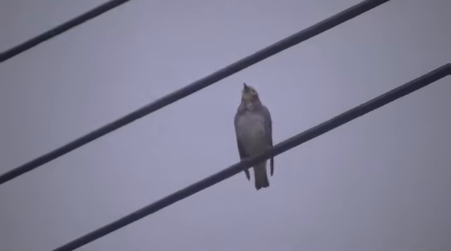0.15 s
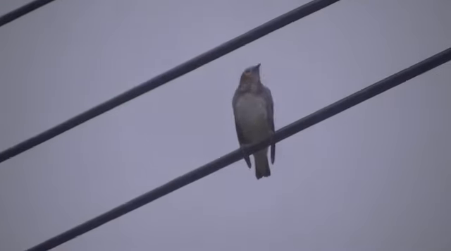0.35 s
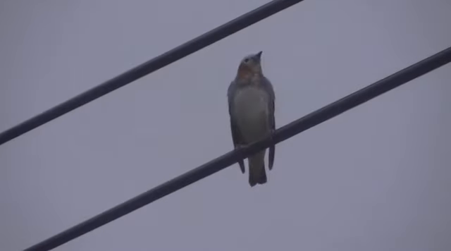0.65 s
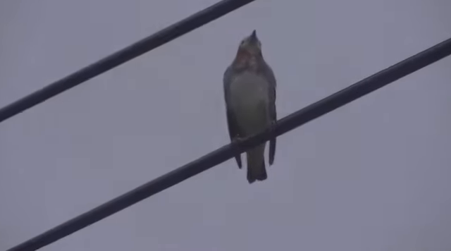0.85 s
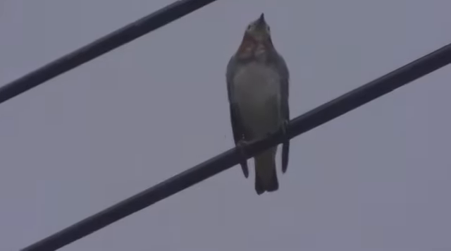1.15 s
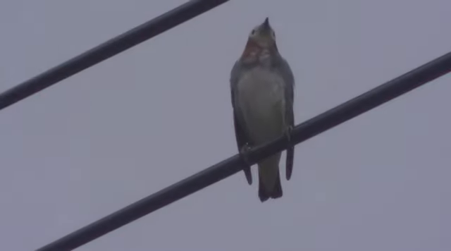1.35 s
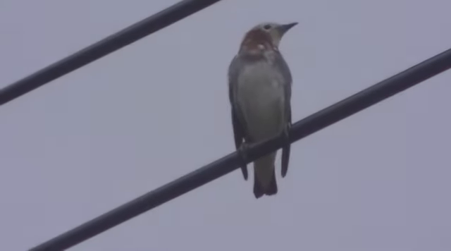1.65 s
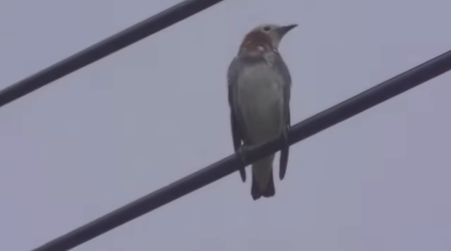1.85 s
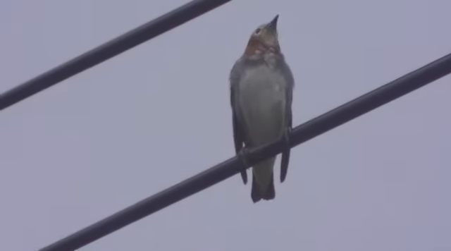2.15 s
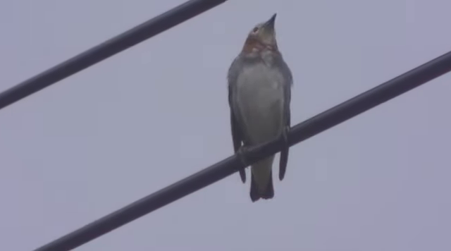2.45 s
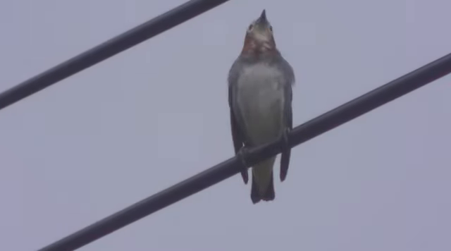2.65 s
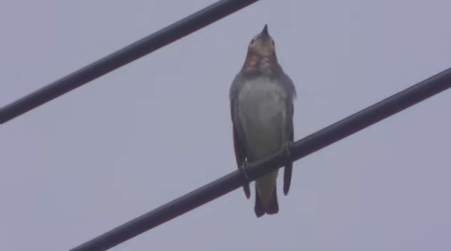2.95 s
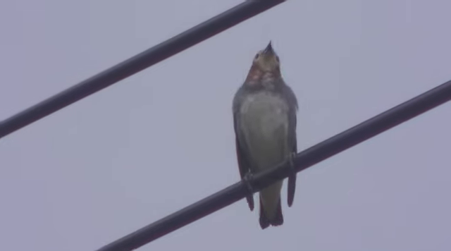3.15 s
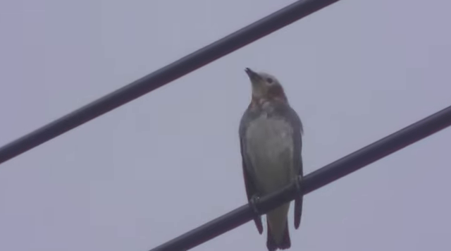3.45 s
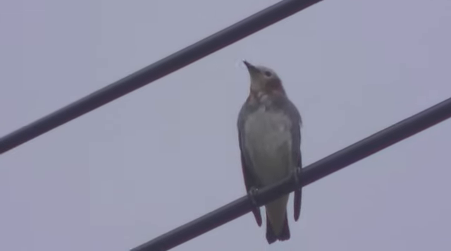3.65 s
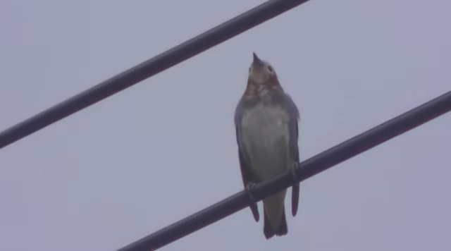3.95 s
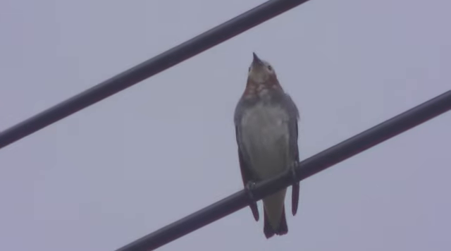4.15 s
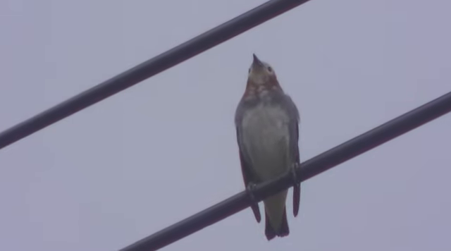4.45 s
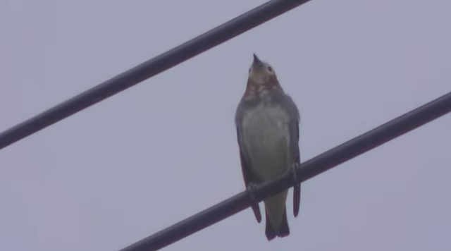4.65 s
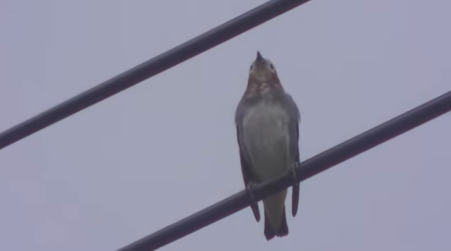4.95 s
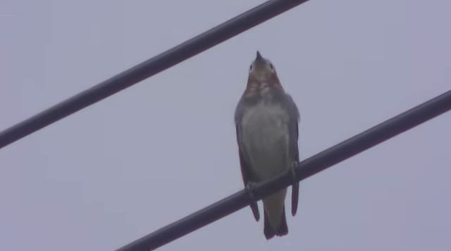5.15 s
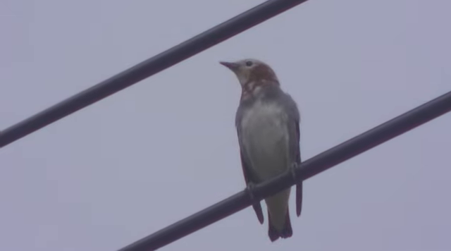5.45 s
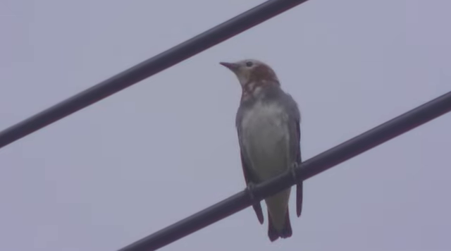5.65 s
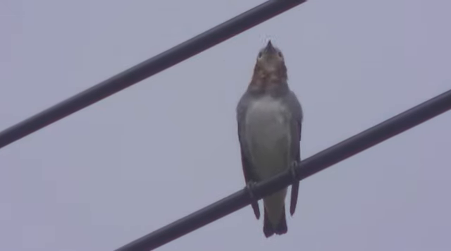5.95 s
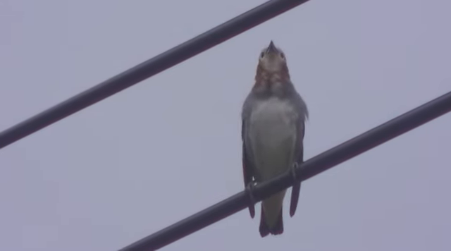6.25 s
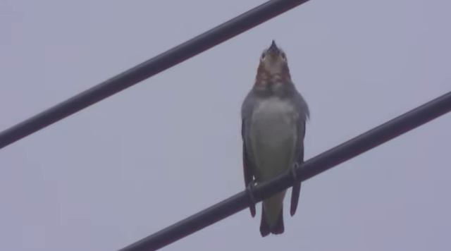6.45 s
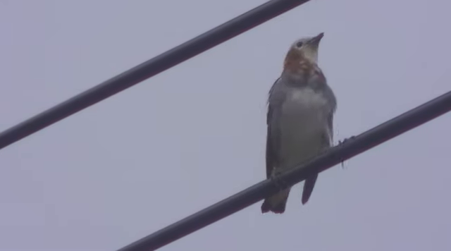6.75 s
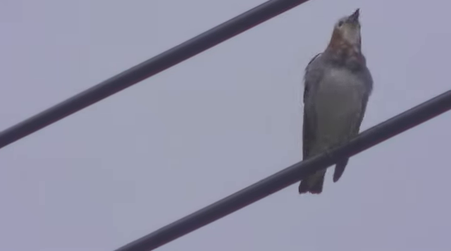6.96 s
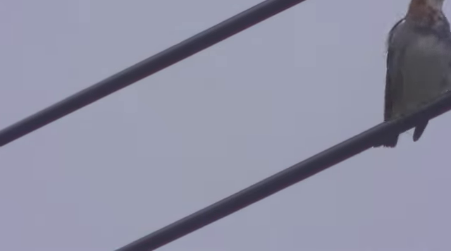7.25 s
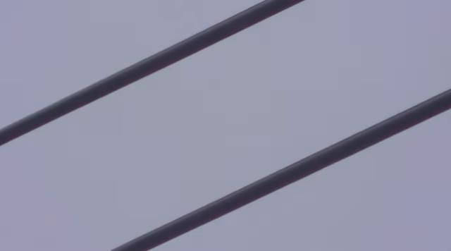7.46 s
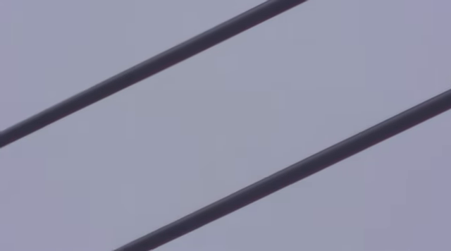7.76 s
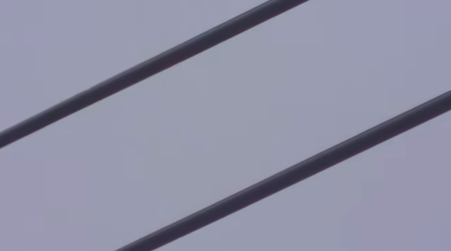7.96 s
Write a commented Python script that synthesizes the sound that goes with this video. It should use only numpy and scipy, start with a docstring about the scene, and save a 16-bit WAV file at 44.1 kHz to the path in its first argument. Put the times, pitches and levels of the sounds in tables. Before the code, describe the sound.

Over a quiet street's soft hiss, a bird rattles out rapid dry chirrs, pauses with sparse chips, then bursts into lively whistled, raspy song.

```python
"""Starling on a wire

A starling sings over a quiet street: a sharp call, a long run of dry chirrs, scattered chips, then louder
arching whistles and buzzing rasps. Tones are phase-driven partials; chirrs are ringing windpipe modes.
Soft rustles are shaped noise bursts, faint house echoes are filtered impulse responses, and distant
traffic and hiss are wavering noise bands underneath."""
import sys
import numpy as np
from scipy import signal
from scipy.fft import rfft, irfft
from scipy.io import wavfile
from scipy.ndimage import uniform_filter1d

SR = 44100
rng = np.random.default_rng(int(sys.argv[2]) if len(sys.argv) > 2 else 0)


def unload_audio(sound):
    """Save the sound as a 16-bit wav file, at the path given as the first command line argument."""
    columns = np.transpose(np.atleast_2d(sound))
    # keep every value between -1 and 1, then stretch to whole-number steps
    steps = np.round(np.clip(columns, -1, 1) * 32767)
    wavfile.write(sys.argv[1], SR, steps.astype(np.int16))


N = 356769


def undb(db):
    """Decibels to gain."""
    return 10 ** (np.asarray(db) / 20)


def unit(x):
    """Scale to rms 1."""
    return x / np.sqrt(np.mean(x ** 2) + 1e-20)


def add(out, s, x):
    """Mix x into out from time s."""
    i = max(int(s * SR), 0)
    out[i:i + len(x)] += x[:max(N - i, 0)]


def on_log(hz, points):
    """Read a (f/Hz, value) curve on a log-frequency axis."""
    f, v = np.transpose(points)
    return np.interp(np.log(hz + 1e-3), np.log(f), v)


def wobble(n, hz):
    """Smooth random motion up to about hz, spread 1."""
    longer = n + SR // 10
    f = np.fft.rfftfreq(longer, 1 / SR)
    spectrum = rfft(rng.standard_normal(longer)) * np.exp(-(f / hz) ** 2)
    return unit(irfft(spectrum))[:n]


def resonance(hz, centre_hz, width_hz):
    """Gain of a band-pass resonance."""
    return 1 / np.sqrt(1 + ((hz ** 2 - centre_hz ** 2) / (width_hz * hz + 1e-9)) ** 2)


def turn(hz):
    """Running phase of a moving frequency."""
    return 2 * np.pi * np.cumsum(hz) / SR


def syllable(length, edge_s=0.0037):
    """Time since the start of a syllable, and its soft gate."""
    t = np.arange(0, length, 1 / SR)
    return t, np.clip(np.minimum(t, t[-1] - t) / edge_s, 0, 1)


def ease(t, start, length):
    """Smooth step from 0 to 1."""
    return .5 - .5 * np.cos(np.pi * np.clip((t - start) / length, 0, 1))


def sing(voice, rows):
    """Play every row of an event table with one voice."""
    out = np.zeros(N)
    for s, *row in rows:
        add(out, s, voice(*row))
    return out


AIR_DB = -60  # rms of the bed before its swells
# relative spectrum of the street air: (f/Hz, density/dB)
AIR_SPECTRUM = [(18, -67), (30, -41), (167, -28.5), (394, -6.5), (485, -5), (837, -0.5), (1090, -0.5),
                (1240, -2.5), (2770, -8.5), (3410, -8.5), (4420, -10), (4900, -12.5), (7060, -21),
                (8470, -23.5), (15000, -36.5)]
# likeness of left and right: (f/Hz, correlation)
AIR_LIKENESS = [(60, .1), (250, 0.3), (500, 0.24), (1000, 0.43), (2000, 0.58), (5000, 0.73), (8000, 1)]
# slow swells of distant traffic and high hiss: (t/s, murmur level/dB, hiss level/dB)
AIR_SWELL = [(0, 1.5, 3), (.4, 2.5, 4.5), (.9, 2, 6.5), (1.4, 2, 4.5), (2.7, 1.5, 6.5), (3.4, 1, 4.5),
             (4.2, -0.5, 3), (5, 2, 4), (7, 0, 3), (8.1, 2.5, 8)]


def air(flicker_db=1.36):
    """Distant traffic and hiss: octave bands that waver gently, wide in the bass and centred in the treble."""
    f = np.fft.rfftfreq(N, 1 / SR)
    likeness = np.clip(on_log(f, AIR_LIKENESS), 0, 1)
    mid, side = rfft(rng.standard_normal((2, N))) * undb(on_log(f, AIR_SPECTRUM))
    side = side * np.sqrt((1 - likeness) / (1 + likeness))
    spectra = np.array([mid + side, mid - side]) * undb(AIR_DB) / np.std(irfft(mid, N))
    s, *columns = np.transpose(AIR_SWELL)
    murmur_db, hiss_db = (np.interp(np.arange(N) / SR, s, c) for c in columns)
    octave = np.clip(np.log2(f / 125 + 1e-9), 0, 6)
    out = 0
    for k in range(7):
        share = np.maximum(1 - abs(octave - k), 0)  # neighbouring bands crossfade
        swell_db = murmur_db if k < 4 else hiss_db
        db = swell_db + flicker_db * wobble(N, 3.0)
        out = out + irfft(spectra * share, N) * undb(db)
    return out


# soft hisses, grainy chirps, ticks and a far knock:
# (t/s, rise t/s, decay t/s, centre f/Hz, half-width f/Hz, level/dB)
RUSTLES = [(0, 0.00073, 0.16, 3170, 1580, -54.5), (.144, 0.0008, 0.0014, 7660, 3500, -46),
           (0.152, 0.0083, 0.021, 3750, 1800, -54.5), (.47, 0.053, 0.13, 4160, 1800, -60.5),
           (0.601, 0.17, 0.14, 990, 217, -62.5), (1.112, 0.018, 0.025, 3450, 3700, -45.5),
           (1.151, .015, 0.019, 2940, 350, -50), (1.816, .012, 0.023, 4800, 900, -50),
           (1.843, 0.0088, .009, 3020, 500, -49), (2.139, 0.07, 0.2, 1110, 544, -55.5),
           (3.53, 0.024, 0.11, 1020, 404, -55), (3.584, 0.0016, 0.0068, 870, 348, -47.5),
           (4.571, 0.04, 0.092, 3700, 1390, -53.5), (5.607, 0.0048, 0.014, 2810, 2800, -47.5),
           (6.139, 0.0064, 0.0079, 3700, 1680, -41.5), (6.297, 0.064, 0.069, 3400, 1580, -56.5),
           (6.505, 0.0047, 0.0089, 4020, 4070, -46.5), (7.459, 0.011, 0.03, 1720, 700, -49.5),
           (7.831, 0.039, 0.014, 8950, 1310, -55.5)]


def rustles(grain_db=2):
    """Soft grainy noises that swell and die away in one broad band."""
    out = np.zeros(N)
    t = np.arange(SR) / SR
    f = np.fft.rfftfreq(SR, 1 / SR)
    for s, rise, decay, hz, width_hz, db in RUSTLES:
        band = np.exp(-((f - hz) / width_hz) ** 2) * np.minimum(f / 500, 1) ** 3
        hiss = irfft(rfft(rng.standard_normal(SR)) * band)
        grainy = unit(hiss * undb(grain_db * wobble(SR, 110)))
        envelope = np.minimum(t / rise, 1) * np.exp(-np.maximum(t - rise, 0) / decay)
        add(out, s, undb(db) * grainy * envelope)
    return out


# thin pure glides, near and far: (t/s, length t/s, start f/Hz, end f/Hz, level/dB)
GLIDES = [(1.135, 0.032, 6350, 5900, -50.5), (2.242, .064, 1305, 1240, -57.5),
          (2.32, 0.035, 8000, 7330, -58), (2.421, 0.2, 1360, 1130, -65.5), (2.603, 0.013, 2320, 2840, -52),
          (2.607, .056, 1423, 1200, -55.5), (2.613, 0.071, 2760, 2120, -55.5),
          (3.161, .14, 1344, 1100, -63), (4.528, 0.083, 7480, 7640, -63), (4.723, .036, 7040, 7080, -67),
          (5.04, 0.067, 7100, 7060, -65.5), (5.582, 0.035, 6600, 7340, -61.5),
          (6.502, 0.02, 7800, 7650, -52), (6.508, 0.031, 7470, 7040, -46.5),
          (6.604, 0.016, 4050, 5820, -41.5), (6.719, 0.011, 3600, 4050, -51.5),
          (7.556, 0.035, 7550, 7560, -54), (7.598, 0.023, 7650, 5800, -60)]


def glide(length, start_hz, end_hz, db, third_db=-50, octave_db=-32, curve=1., rough=0.018,
          hook=0.033, hook_s=0.0016):
    """A brief slur: a small upward hook, a quick slide, then the pitch levels off."""
    u = np.linspace(0, 1, int(length * SR))
    slide = np.interp(u, [0, .22, .48, .74, 1], [0, .05, .5, .85, 1])
    hz = end_hz + (start_hz - end_hz) * (1 - slide) ** curve
    hz = hz * (1 - hook * np.exp(-u * length / hook_s))
    phase = turn(hz * (1 + rough * wobble(len(u), 600)))
    third = undb(third_db) * np.sin(3 * phase) * (3 * hz < SR / 2)
    tone = np.sin(phase) + undb(octave_db) * np.sin(2 * phase) + third
    return np.sqrt(2) * undb(db) * tone * np.abs(np.sin(np.pi * u)) ** .5


CALL_START_HZ, CALL_RISE_S, CALL_SETTLE_S = 3400, 0.025, 0.01
CALL_SWING_HZ, CALL_SWING_DB, CALL_ATTACK_DB, CALL_FADE_DB_PER_S = 345, 2.5, 19.5, 64
# sharp zigzag calls: (t/s, length t/s, attack t/s, swing period t/s, top f/Hz, resting f/Hz, level/dB,
# roughness as a share of pitch)
SHARP_CALLS = [(1.148, .094, 0.021, 0.018, 5860, 3965, -39.5, 0.03),
               (5.595, 0.08, 0.041, .0205, 6100, 3860, -40, 0.05)]


def call(length, attack, period, top_hz, rest_hz, db, rough, overtone_db=-36):
    """One side of the syrinx shoots up, drops back and swings unsteadily near 4 kHz, louder on upswings."""
    t, gate = syllable(length)
    after = np.maximum(t - CALL_RISE_S, 0)
    swing = np.cos(2 * np.pi * after / period)
    overshoot = (top_hz - rest_hz - CALL_SWING_HZ) * np.exp(-after / CALL_SETTLE_S)
    hz = rest_hz + CALL_SWING_HZ * swing + overshoot
    hz = CALL_START_HZ + (hz - CALL_START_HZ) * np.minimum(t / CALL_RISE_S, 1) ** 1.4
    db = db + CALL_SWING_DB * swing
    db = db - CALL_ATTACK_DB * np.maximum(1 - t / attack, 0) - CALL_FADE_DB_PER_S * after
    phase = turn(hz * (1 + rough * wobble(len(t), 1100)))
    tone = np.sin(phase) + undb(overtone_db) * np.sin(2 * phase)
    return np.sqrt(2) * gate * undb(db) * tone


# windpipe resonances before the beak colours them: (f/Hz, width f/Hz, level/dB)
WINDPIPE = [(2120, 105, 7.5), (2865, 70, 5), (3700, 350, 0.5), (4330, 120, 4.5), (5014, 210, 2),
            (5780, 750, -8.5), (6650, 960, -8.5), (7900, 430, -14)]
# onsets of the dry chirrs, which speed up to about 15 a second and slow again: (t/s)
CHIRR_ONSETS = [1.502, 1.579, 1.688, 1.779, 1.869, 1.939, 2.007, 2.073, 2.149, 2.215, 2.287, 2.352, 2.426,
                2.490, 2.557, 2.622, 2.687, 2.756, 2.829, 2.894, 2.962, 3.028, 3.109, 3.185, 3.266, 3.361]
# effort over the run, two swells, before the make-up gain: (t/s, level/dB)
CHIRR_EFFORT = [(1.5, -50.5), (1.87, -51.5), (2.2, -47.5), (2.62, -50), (2.93, -47), (3.18, -50),
                (3.27, -53.5), (3.36, -51.5)]


def chirrs(length=0.037, open_hz=6600, shut_hz=3500, width_hz=2200, leak_db=-14.0, edge_hz=7900,
           gain_db=4.0, rattle=0.19, rattle_hz=700, uneven_db=1.0):
    """Rattling, turbulent bursts through the windpipe; the closing beak favours ever lower resonances."""
    out = np.zeros(N)
    u = np.linspace(0, 1, int(length * SR))
    envelope = np.interp(u, [0, .06, .18, .42, .72, 1], [0, .3, .95, .95, .52, 0])
    f = np.fft.rfftfreq(4096, 1 / SR)
    treble_edge = np.sqrt(1 + (f / edge_hz) ** 16)
    modes = np.array([resonance(f, hz, width) ** 1.07 / treble_edge for hz, width, _ in WINDPIPE])
    beak_hz = open_hz + (shut_hz - open_hz) * u
    beak = np.array([undb(db) * (undb(leak_db) + resonance(hz, beak_hz, width_hz) ** 2)
                     for hz, _, db in WINDPIPE])
    for s in CHIRR_ONSETS:
        db = np.interp(s, *np.transpose(CHIRR_EFFORT))
        turbulence = np.exp(2j * np.pi * rng.random(modes.shape))
        rings = irfft(modes * turbulence)[:, :len(u)]
        rings = rings * undb(uneven_db * rng.standard_normal((len(modes), 1)))
        pulses = 1 + rattle * np.sin(turn(rattle_hz * (1 + 0.12 * wobble(len(u), 360))))
        burst = (beak * rings).sum(axis=0) * pulses
        burst = burst / np.sqrt(uniform_filter1d(burst ** 2, size=300))  # the driving pressure is steady
        add(out, s - .001, burst * envelope * undb(db + gain_db))
    return out


CHIP_DROP, CHIP_TYPICAL_S, CHIP_DROP_GROWTH = 0.15, .02, 0.36  # share of pitch lost by a typical chip
CHIP_LEVELLING_S = .022  # chips longer than this flatten out at the end
# down-slurred chips: (t/s, length t/s, start f/Hz, level/dB, third harmonic level/dB re fundamental)
CHIPS = [(2.32, 0.033, 4620, -53, -42.5), (2.855, 0.091, 4740, -48.5, -40), (2.98, 0.026, 4530, -47, -29),
         (3.063, 0.019, 4400, -43.5, -26), (3.155, 0.011, 4250, -42, -25), (3.261, 0.014, 4430, -41.5, -26),
         (3.482, .014, 4700, -69.5, -55), (3.649, 0.014, 4620, -46, -31), (3.807, 0.016, 4750, -60, -50),
         (4.001, 0.063, 4540, -49, -28), (4.084, 0.058, 4520, -61, -38), (4.16, 0.031, 4410, -60, -38),
         (4.32, 0.037, 4300, -60.5, -40), (5.174, 0.0203, 4510, -41, -42), (5.258, 0.019, 4560, -37.5, -45),
         (5.38, .019, 4560, -59, -50), (7.199, 0.018, 4600, -40, -40), (7.298, 0.0202, 4440, -39.5, -44),
         (7.32, 0.013, 4700, -56, -40)]


def chip(length, start_hz, db, third_db):
    """A downward slur that falls further, and flattens out more, the longer it lasts."""
    drop = CHIP_DROP * (length / CHIP_TYPICAL_S) ** CHIP_DROP_GROWTH
    curve = np.sqrt(length / CHIP_LEVELLING_S)
    return glide(length, start_hz, start_hz * (1 - drop), db, third_db, octave_db=-30.5, curve=curve,
                 rough=0.0073, hook=0.13)


def whistle(hz, first_db, second_db, rough=.003, buzz=0., buzz_hz=175, third_db=-23, fall_db=9):
    """Two strong partials and fading upper ones; a flutter of the syrinx makes it buzz."""
    flutter = np.sin(turn(buzz_hz * (1 + 0.11 * wobble(len(hz), 57))))
    phase = turn(hz * (1 + buzz * flutter + rough * wobble(len(hz), 510)))
    drive = undb(second_db) + 0.065 * undb(first_db)  # the upper partials follow mostly the octave
    upper = sum(undb(third_db - fall_db * (k - 3)) * np.sin(k * phase) * (k * hz < SR / 2)
                for k in range(3, 8))
    tone = undb(first_db) * np.sin(phase) + undb(second_db) * np.sin(2 * phase) + drive * upper
    return np.sqrt(2) * tone * (1 + 9 * buzz * flutter)


# short whistled notes: (t/s, length t/s, start f/Hz, middle f/Hz, end f/Hz, fundamental level/dB,
# octave level/dB, swell from start to end/dB, third harmonic level/dB re the upper-partial drive)
NOTES = [(6.025, 0.023, 1474, 1447, 1410, -53.5, -45.5, 13, -31),
         (6.045, 0.049, 1348, 1324, 1280, -54, -36, 1.5, -32),
         (6.094, 0.054, 2040, 1860, 2205, -41.5, -51.5, -4, -18),
         (6.148, 0.03, 1633, 1600, 1620, -47.5, -45.5, -4, -27),
         (6.486, 0.029, 1850, 2342, 1900, -53, -48.5, 10, -17)]


def note(length, start_hz, middle_hz, end_hz, first_db, second_db, swell_db, third_db):
    """A short whistle on one simple bend, swelling or fading evenly."""
    t, gate = syllable(length)
    u = t / length
    bend = np.polyfit([0, .5, 1], [start_hz, middle_hz, end_hz], 2)
    tone = whistle(np.polyval(bend, u), first_db, second_db, rough=0.0094, third_db=third_db, fall_db=5.5)
    return gate * undb(swell_db * (u - .5)) * tone


RASP_ATTACK_S, RASP_CLEAR_S, RASP_CALM_S = .009, .019, 0.068  # harsh from the clear start until it calms
# throat and open beak, scaled by each rasp's focus: (f/Hz, level/dB)
THROAT = [(1000, -12), (1600, -8), (2300, -11.5), (3100, 0), (3900, 0.5), (4800, -1), (5700, -14.5),
          (6800, -23), (8300, -19), (13000, -38)]
# course of every rasp: (share of its length, share of its pitch rise, effort level/dB)
RASP_SHAPE = [(0, 0, -8), (.3, 1, -1.5), (.64, .55, -2), (.82, .13, -10), (1, 0.43, -12)]
# harsh syllables: (t/s, length t/s, start f/Hz, top f/Hz, level before effort/dB,
# flutter depth as a share of pitch, flutter f/Hz, roughness as a share of pitch, throat focus)
RASPS = [(6.582, 0.049, 1173, 1306, -33, 0, 318, 0.11, 1.22),
         (7.691, 0.099, 1143, 1642, -38.5, .075, 198.8, 0.08, 1.17),
         (7.954, .098, 1122, 1620, -39, 0.04, 201.4, 0.09, 1.15)]


def rasp(length, start_hz, top_hz, db, buzz, buzz_hz, rough, focus):
    """A low harmonic stack through the throat; it starts clear and breaks into a harsh flutter."""
    t, gate = syllable(length)
    share, *columns = np.transpose(RASP_SHAPE)
    lift, effort_db = (np.interp(t / length, share, c) for c in columns)
    harsh = .08 + .92 * (ease(t, RASP_CLEAR_S, .005) - ease(t, RASP_CALM_S, .005))
    flutter = signal.sawtooth(turn(buzz_hz * (1 + .08 * wobble(len(t), 79))), .25)
    shake = harsh * (buzz * flutter + rough * wobble(len(t), 830))
    hz = (start_hz + (top_hz - start_hz) * lift) * (1 + shake)
    phase = turn(hz)
    tone = sum(undb(focus * on_log(k * hz, THROAT)) * np.sin(k * phase) for k in range(1, 10))
    tone = unit(tone * (1 + 0.15 * harsh * flutter))
    return gate * ease(t, 0, RASP_ATTACK_S) * undb(db + effort_db) * tone


ARCH_START_HZ, REBOUND_HZ, REBOUND_S = 1620, 162, 0.055
BEAK_WIDTH_HZ, BEAK_SHARPNESS = 850, 1.04
ARCH_ONSET_DB, ARCH_ATTACK_S, ARCH_CLIMB_DB, ARCH_TROUGH_DB = -15, .02, -5.5, -7.5
TAIL_DELAY_S, TAIL_SWELL_S, TAIL_END_DB = 0.013, 0.017, -4
# arching whistles with a low tail: (t/s, rise t/s, lag of the rise, hold t/s, fall t/s, tail t/s, top f/Hz,
# trough f/Hz, beak f/Hz, crest level/dB, octave in the crest/dB, tail level/dB, octave in the tail/dB);
# levels are those before the beak resonance
ARCHES = [(6.699, 0.094, 3.1, .015, .074, 0.07, 2923, 1565, 2720, -32.5, -20, -34.5, -8.3),
          (7.021, 0.11, 1.36, .01, 0.067, 0.071, 2977, 1696, 3450, -35, -5, -33, -0.79),
          (7.355, .128, 1.15, .004, 0.073, 0.071, 2916, 1696, 3340, -36, 0, -32.5, -1.5)]


def arch(rise, lag, hold, fall, tail, top_hz, trough_hz, beak_hz, crest_db, crest_octave_db,
         tail_db, tail_octave_db):
    """Pitch climbs, holds, falls and rebounds on a second push; the beak favours partials near its resonance."""
    t, gate = syllable(rise + hold + fall + tail)
    crest_end = rise + hold
    trough = crest_end + fall
    push = trough + TAIL_DELAY_S
    climb = (top_hz - ARCH_START_HZ) * ease(t, 0, rise) ** (lag / 2)
    descent = (top_hz - trough_hz) * ease(t, crest_end, fall)
    hz = ARCH_START_HZ + climb - descent + REBOUND_HZ * ease(t, trough, REBOUND_S)
    effort_db = np.interp(
        t, [0, ARCH_ATTACK_S, crest_end, push, push + TAIL_SWELL_S, trough + tail],
        [crest_db + ARCH_ONSET_DB, crest_db + ARCH_CLIMB_DB, crest_db,
         tail_db + ARCH_TROUGH_DB, tail_db, tail_db + TAIL_END_DB])
    octave_db = crest_octave_db + (tail_octave_db - crest_octave_db) * ease(t, crest_end, fall)
    first_db, second_db = (
        effort_db + BEAK_SHARPNESS * 20 * np.log10(resonance(k * hz, beak_hz, BEAK_WIDTH_HZ)) for k in (1, 2))
    return gate * whistle(hz, first_db, second_db + octave_db, rough=0.0051, third_db=-21.5, fall_db=8.5)


BUZZ_START_HZ, BUZZ_RISE_S, BUZZ_FUNDAMENTAL_DB = 1600, 0.01416, -12.5  # fundamental re octave
BUZZ_ONSET_DB, BUZZ_SWELL_S, BUZZ_RELEASE_S, BUZZ_END_DB = -8.5, 0.072, 0.028, -7
# buzzing whistles: (t/s, length t/s, top f/Hz, sag in Hz per s, octave level/dB,
# flutter depth as a share of pitch, flutter f/Hz)
BUZZES = [(7.78, 0.12, 2136, 4100, -34, 0.05, 180.6), (8.044, .11, 2066, 910, -32.5, 0.03, 187)]


def buzz_note(length, top_hz, sag_hz_per_s, db, depth, flutter_hz):
    """A fluttering whistle that leaps up, then sags as it swells."""
    t, gate = syllable(length)
    leap = (top_hz - BUZZ_START_HZ) * ease(t, 0, BUZZ_RISE_S)
    hz = BUZZ_START_HZ + leap - sag_hz_per_s * np.maximum(t - BUZZ_RISE_S, 0)
    db = db + BUZZ_ONSET_DB * np.maximum(1 - t / BUZZ_SWELL_S, 0)
    db = db + BUZZ_END_DB * ease(t, length - BUZZ_RELEASE_S, BUZZ_RELEASE_S)
    return gate * whistle(hz, db + BUZZ_FUNDAMENTAL_DB, db, rough=0.024, buzz=depth, buzz_hz=flutter_hz,
                          third_db=-27.5, fall_db=5)


# reflections from road and houses, before each group's echo trim: (delay t/s, level/dB, smear t/s)
ECHOES = [(.0043, -11.5, .00001), (.0072, -9, .0001), (.044, -28, 0.0034), (0.062, -43, 0.0041),
          (.132, -16, .005), (0.145, -36.5, 0.0075)]


def street(x, echo_db, tail_db, t60=0.74, spread=0.2, damp_hz=5200):
    """Smeared reflections and a diffuse tail, both duller than the direct sound."""
    t = np.arange(SR) / SR
    f = np.fft.rfftfreq(SR, 1 / SR)
    echoes = 0
    for delay, db, smear in ECHOES:
        lag = np.arange(SR) - int(delay * SR)
        # the road mirrors, the houses scatter
        scatter = np.where(lag == 0, 1, rng.standard_normal(SR) * (delay > .02))
        reflection = scatter * (lag >= 0) * np.exp(-abs(lag) / (smear * SR))
        echoes = echoes + undb(db + echo_db) * unit(reflection)
    decay = undb(-60 * t / t60) * np.minimum(t / 0.0043, 1)
    mid, side = undb(tail_db) * unit(rng.standard_normal((2, SR)) * decay)
    responses = np.array([echoes + mid + spread * side, echoes + mid - spread * side]) / np.sqrt(SR)
    responses = irfft(rfft(responses) / np.sqrt(1 + (f / damp_hz) ** 6))
    return x + signal.fftconvolve(x[None], responses, axes=1)[:, :N]


def scene():
    """The starling's song note after note, and two sharp calls from further off, over the street air."""
    song = rustles() + sing(glide, GLIDES) + sing(note, NOTES)
    song = song + sing(arch, ARCHES) + sing(rasp, RASPS) + sing(buzz_note, BUZZES)
    dry_run = chirrs() + sing(chip, CHIPS)
    far_calls = sing(call, SHARP_CALLS)
    birds = street(song, echo_db=-1.5, tail_db=-11.0)
    birds = birds + street(dry_run, echo_db=-3.0, tail_db=-8.5)
    birds = birds + street(far_calls, echo_db=1.0, tail_db=-4.5, damp_hz=4800)
    birds = signal.sosfilt(signal.butter(4, 280, "highpass", fs=SR, output="sos"), birds)
    pan_db = -.5  # left relative to right
    return birds * undb(np.array([[pan_db], [-pan_db]]) / 2) + air()


def record(dry):
    """A steep low-pass cuts the top of the treble above 14.8 kHz."""
    return signal.sosfilt(signal.ellip(10, .2, 60, 14800, fs=SR, output="sos"), dry)


dry = scene()
out = record(dry)
unload_audio(out)
```